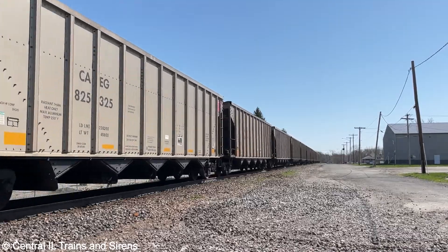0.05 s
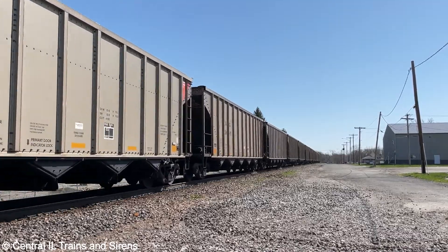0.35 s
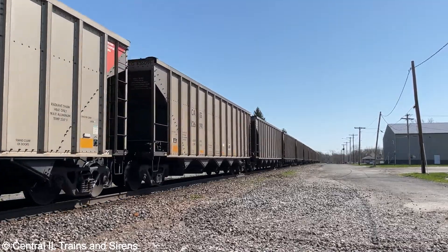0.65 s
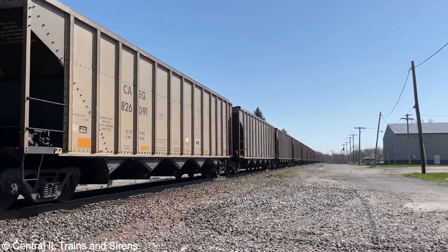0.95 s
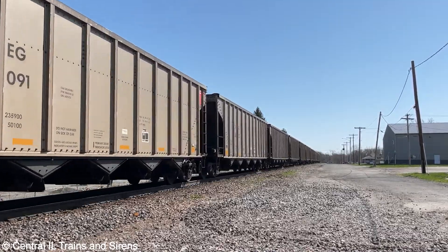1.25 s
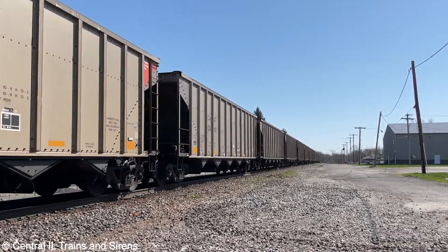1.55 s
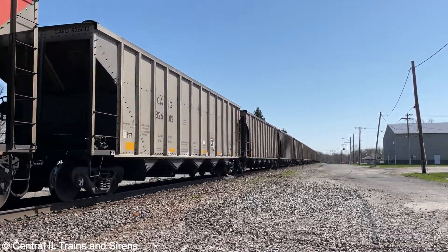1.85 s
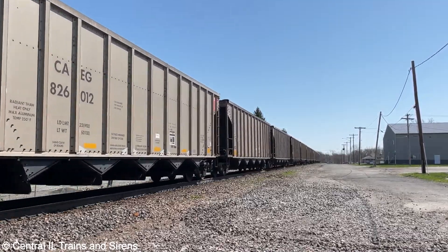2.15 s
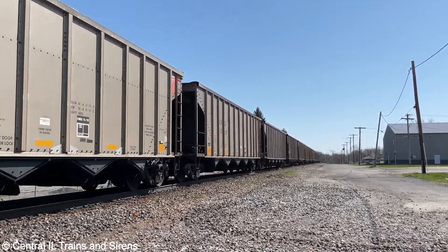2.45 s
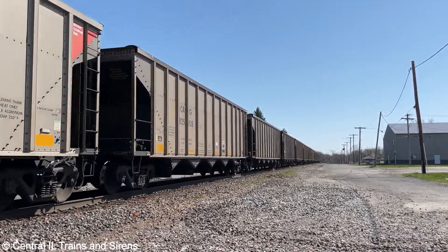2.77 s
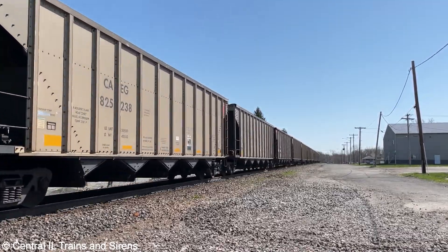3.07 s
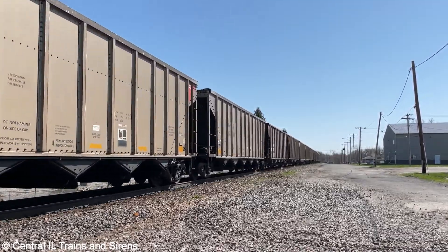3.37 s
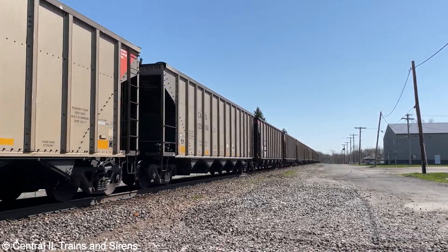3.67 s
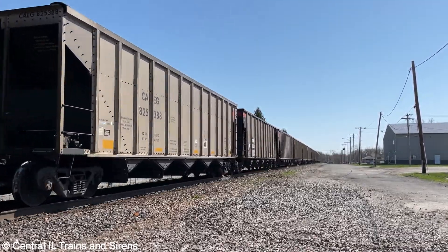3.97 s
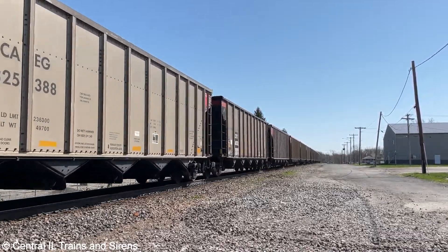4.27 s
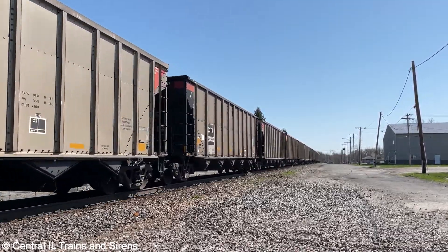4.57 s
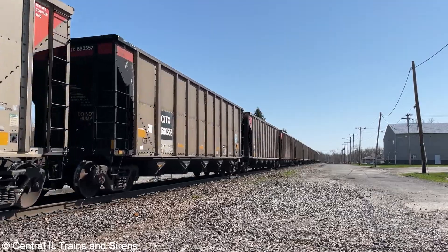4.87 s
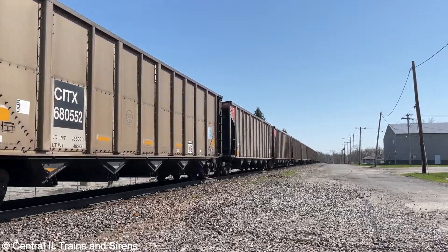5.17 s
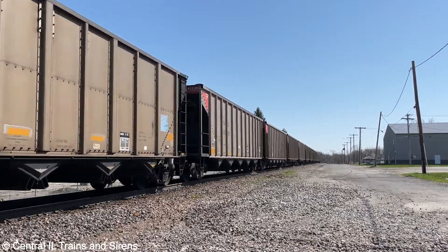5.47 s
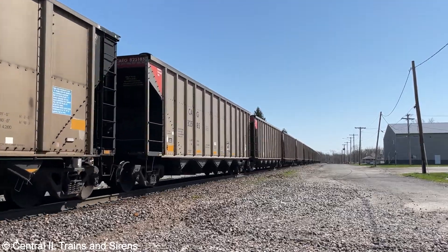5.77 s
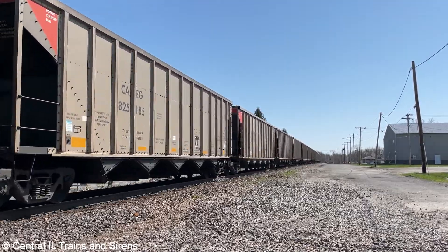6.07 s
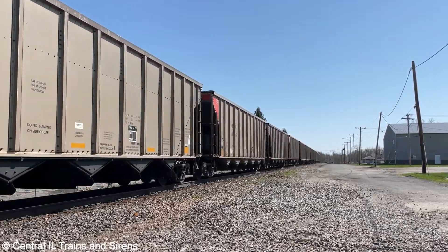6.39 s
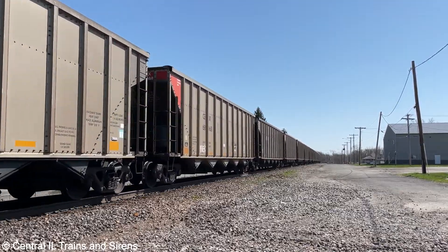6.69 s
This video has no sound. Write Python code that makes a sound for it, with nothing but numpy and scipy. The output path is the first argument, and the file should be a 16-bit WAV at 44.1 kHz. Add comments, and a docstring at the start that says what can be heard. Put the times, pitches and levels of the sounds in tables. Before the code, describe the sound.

A freight train of hopper cars rolls past throughout, heard outdoors from close beside the track, with a deep, continuous rumble leaning to the left. About once a second, steel wheels swell into a gritty roar and hiss on rough rail, then hammer over a joint slightly ahead in two quick pairs of clacks. These groups start at roughly 0.1, 1, 2, 3, 4.1, 5.1 and 6.1 seconds; the first has only three clacks. Each clack brings a smaller second knock, a short steel ring and rattling gear. Loud, booming clanks hit at about 0.7 and 1.7 seconds, each with a brief squeal. Lighter, bright chinks follow near 2.7, 3.7, 4.7 and 5.8 seconds. Hollow car bodies thud now and then, and thin, high, fluttering wheel tones come and go. The speed and rhythm hold steady to the end, around 6.5 seconds.

```python
"""Steel wheels clack over a rail joint and a deep rumble: a freight train rolls by, one car a second.
Each group of four axles roars and hisses over rough rail on the left, then hammers over the joint
a little ahead in two pairs of clacks. Every wheel knocks again a moment later and rings on while
loose gear rattles. Rubbed wheels sing, hollow hopper cars thud, and twice a leading wheel
hits the rough rail with a loud clank."""
import sys
import numpy as np
from scipy import signal
from scipy.fft import rfft, irfft
from scipy.io import wavfile
from scipy.ndimage import uniform_filter1d

SR = 44100
rng = np.random.default_rng(int(sys.argv[2]) if len(sys.argv) > 2 else 0)


def persist_wave(psi):
    """Save psi, clipped to +-1, as 16-bit WAV."""
    counts = np.round(np.clip(psi, -1, 1) * 32767).astype(np.int16)
    wavfile.write(sys.argv[1], SR, np.atleast_2d(counts).T)


N = 296793
TIME = np.arange(N) / SR
HZ = np.fft.rfftfreq(N, 1 / SR)
SPEED_M_PER_S = 16
SECOND_KNOCK_S = 0.0629  # wait between a wheel's two knocks

# Levels in the tables are relative: each layer adds its own gain.
# Tone colours, or how strong each pitch is in a noise: f/Hz, level/dB
BODY_RUMBLE = [(20, -43), (32, -12.5), (45, -4), (62, 1), (130, -3), (200, -1.15), (280, -7.5), (400, -19),
               (700, -70), (9000, -80)]  # car bodies rumbling
TRUCK_ROAR = [(120, -30), (220, -3.5), (330, 0.5), (480, -3), (680, -4), (950, -8), (1350, -14),
              (1750, -12.5), (2300, -19.5), (3200, -23), (6000, -34), (10000, -88)]  # a rolling truck (the frame that holds two axles)
TRUCK_BOOM = [(70, -31), (160, 13), (270, -8), (450, -37), (1200, -68)]  # a truck booming on rough rail
TRUCK_GRIND = [(250, -23), (600, 8.5), (1250, 7.5), (2000, -8), (3000, -12), (5800, -7), (8000, -30),
               (15500, -46)]  # a truck grinding over a dent
TRUCK_CLATTER = [(100, -62), (280, 9), (430, 6.5), (740, 1), (1000, -6), (1300, -25), (1650, -19),
                 (2200, -13), (3200, -19.5), (4700, -47), (5600, -24), (7000, -24), (8500, -38),
                 (11000, -41), (15500, -50)]  # a truck shaken by a joint
TREAD_HISS = [(1000, -18), (2000, -8), (2800, -21.5), (4000, 4), (5500, 7), (6300, 1), (7300, -4.5),
              (8500, -20), (10500, -22), (13000, -28), (15500, -25)]  # the tread, the running surface of a wheel
WHEEL_SCRUB = [(900, -53), (1800, 8), (2600, -0.5), (3600, 5.5), (4400, 5), (5400, -1), (6600, -4.5),
               (7600, -42), (8500, -7), (10500, -17), (13000, -22), (15500, -18)]  # a shaken wheel scraping the rail
STEEL_CRACK = [(800, 13.5), (1650, 9), (2200, -19), (2750, -28), (3100, 3.5), (4000, 2), (4850, 0.5),
               (5400, -8), (6400, -17), (7600, -5), (11000, -21.5), (15500, -30)]  # steel snapping on steel
# The notes a struck part rings with: f/Hz, level/dB, time to fade by 60 dB/s
WHEEL_MODES = [(1640, 5.5, 0.19), (2723, 1.5, 0.17), (3307, 5.5, 0.14), (3930, 1, 0.21), (4140, 0, 0.18),
               (4470, -1, 0.15), (4890, -6, 0.18), (5110, -5, 0.25), (6410, 1.5, 0.057)]  # a steel wheel
FRAME_MODES = [(429, 1.5, 0.095), (607, 4, 0.08), (745, 1.5, 0.062), (896, 4.5, 0.035), (1334, -0.5, 0.047),
               (1630, 6, 0.027)]  # the truck's side frame and the rail
# How sound from a place reaches both sides: f/Hz, left over right/dB, left lead/rad, likeness (0-1)
FROM_LEFT = [(40, 0.2, 0.34, 1), (198, 1.1, 0.63, 0.97), (497, 1.5, 2.17, 0.85), (990, 10.5, 2.75, 0.82),
             (1680, 7.5, 2.6, 0.82), (2400, 7, 5.5, 0.25), (3050, -4, 3, 0.2), (3750, 1, 2.8, 0.55),
             (4500, -5, 0.7, 0.72), (5150, -0.5, 2.4, 0.78), (5850, -0.5, 1.2, 0.8),
             (6350, -0.3, -1.9, 0.45), (7000, 0, -3.2, 0.6), (7900, 0, -3.2, 0.65), (8400, 0, -3.14, 0.98),
             (8900, 0, -3.14, 0.97), (10700, 0, 0, 0.95), (12000, 0, 0, 0.95), (13500, 0, 3.14, 0.99)]
FROM_JOINT = [(40, -0.2, 0.3, 0.95), (200, 0.9, 0.6, 0.93), (500, 2.9, 1.7, 0.9), (950, 5.9, 2.3, 0.87),
              (1800, 3.4, 2.6, 0.82), (2350, -0.9, 2.4, 0.46), (2800, -6.5, 0.4, 0.35),
              (3300, -0.1, 0.2, 0.87), (4200, 1.3, -0.2, 0.92), (5000, 1.6, -0.6, 0.8),
              (5800, -0.4, -1.2, 0.39), (6500, -4.4, -3.4, 0.3), (7300, 0.5, -3.3, 0.81),
              (8100, 0, -3.14, 0.99), (8800, 0, -3.14, 0.99), (10500, 0, 0, 0.9), (12200, 0, 0, 0.9),
              (13700, 0, 3.14, 0.99)]
# Two coupled car ends pass on four axles: first axle at the joint t/s, roar and hiss/dB, rumble/dB
CAR_ENDS = [(-0.0205, 1, 0.5), (1.002, 0, 0), (2.021, 0, 0), (3.034, -0.5, 1), (4.055, 0, 0.5),
            (5.074, -0.5, 1), (6.089, -0.5, 1), (7.107, 1.5, -4)]
# Those four axles: t/s after the first, roar/dB, hiss/dB
AXLES = [(0.0005, 2.5, 2), (0.112, -1.5, -3.5), (0.243, -2.5, 1), (0.3557, 0.5, -0.5)]
# Bumps that repeat for every car: t/s after its first axle, level/dB
AFTER_KNOCKS = [(0.394, -27), (0.425, -31.5), (0.468, -31), (0.508, -28), (0.59, -32), (0.642, -31)]  # the last wheel's second knock and the soft clatter after the clacks
DENT_JOLTS = [(-0.268, -28), (-0.062, -24.5)]  # dents in the rough rail
# Single hits: t/s, level/dB
WHEEL_BITES = [(2.708, -38), (3.724, -35), (4.741, -38), (5.757, -41)]  # a leading wheel meets the rough rail
DENT_SLAMS = [(1.045, -17), (2.066, -24), (3.086, -18.5), (4.11, -30), (5.122, -20), (6.133, -18)]  # a truck drops into the deepest dent
LOUD_WHEEL_CLANKS = [(0.69, -19), (1.71, -19.5)]  # a leading wheel hits the rough rail hard
# A jolted, hollow car body thuds: t/s, f/Hz, level/dB
BODY_THUDS = [(0.695, 237, -14), (0.801, 150, -16.5), (1.057, 74, -12.5), (1.116, 112, -17.5),
              (1.713, 304, -13), (1.82, 348, -17), (2.058, 208, -19), (2.739, 208, -17.5),
              (3.058, 139, -15), (3.094, 134, -12), (3.853, 200, -14), (4.765, 362, -14),
              (5.119, 199.3, -12), (6.131, 183, -10.5)]
# A rubbed wheel sings: t/s, length/s, f/Hz, level/dB
WHEEL_SONGS = [(0.094, 0.22, 4040, -45), (0.17, 0.6, 3310, -47), (0.41, 0.05, 3300, -39),
               (0.721, 0.1, 1664, -28), (1.031, 0.073, 3910, -34), (1.132, 0.12, 4080, -43),
               (1.165, 0.057, 3280, -40), (1.234, 0.36, 3270, -49), (0.326, 0.11, 4030, -41),
               (1.366, 0.12, 4020, -46), (3.408, 0.09, 2750, -39), (4.405, 0.11, 4740, -52),
               (1.743, 0.15, 1714, -29.5), (2.135, 0.088, 2780, -38), (2.378, 0.075, 4140, -43),
               (2.386, 0.09, 4370, -41), (3.139, 0.45, 3960, -44), (3.193, 0.53, 3400, -49),
               (3.415, 0.102, 4400, -41), (4.057, 0.41, 4020, -42), (4.421, 0.2, 3830, -47.5),
               (5.196, 0.76, 3325, -47.5), (5.317, 0.068, 4020, -42), (5.43, 0.1, 4060, -35),
               (5.492, 0.037, 3300, -33.5), (6.199, 0.34, 4150, -44), (6.265, 0.35, 3380, -48.5),
               (6.326, 0.25, 4940, -44)]
# A wheel hits the joint: t/s, blow level/dB, snap level/dB, snap f/Hz
JOINT_CLACKS = [(0.09, -7, -17.5, 4120), (0.224, -7, -21, 4330), (0.334, -7.5, -22.5, 4800),
                (1.0, -9.5, -18.5, 3900), (1.111, -7, -19.5, 5000), (1.244, -7, -18, 4140),
                (1.355, -7, -22, 4070), (2.022, -8, -24, 3900), (2.133, -6.5, -22, 4540),
                (2.264, -8, -19.5, 4150), (2.375, -6, -19.5, 4410), (3.04, -10.5, -18, 3890),
                (3.149, -6, -18.5, 4170), (3.283, -6.5, -22, 4830), (3.394, -7, -20.5, 4480),
                (4.058, -11, -18.5, 4000), (4.168, -7, -22, 4100), (4.301, -7.5, -20.5, 4900),
                (4.411, -6.5, -22, 4790), (5.076, -15, -18, 3580), (5.186, -6.5, -19.5, 4220),
                (5.317, -5, -20, 4160), (5.429, -7.5, -22, 3700), (6.091, -8, -18.5, 4070),
                (6.201, -6.5, -23.5, 4060), (6.333, -5.5, -20, 4830), (6.444, -6.5, -21.5, 4900)]


def amp(db):
    """Turns decibels into a gain."""
    return 10 ** (np.asarray(db) / 20)


def unit(x):
    """Scales a signal to an average power of 1."""
    return x / np.sqrt(np.mean(x ** 2) + 1e-20)


def noise():
    """Two unrelated white noises."""
    return rng.standard_normal((2, N))


def add(mix, start_s, sound):
    """Lays a sound into the mix at a time."""
    part = mix[int(start_s * SR):][:len(sound)]
    part += sound[:len(part)]


def curves(table):
    """Joins a table's rows into curves over frequency, one for each later column."""
    hz, *columns = np.transpose(table)
    return [np.interp(np.log(HZ + 1), np.log(hz + 1), column) for column in columns]


def colour(x, spectrum):
    """Gives a sound a tone colour; white noise keeps its power."""
    return irfft(rfft(x) * unit(amp(curves(spectrum)[0])), N)


def place(pair, direction):
    """Blends two unrelated signals into the left and right sides of one source."""
    tilt_db, lead, likeness = curves(direction)
    likeness = np.clip(likeness, 0, 1)
    left, other = rfft(pair)
    right = (likeness * left + np.sqrt(1 - likeness ** 2) * other) * np.exp(-1j * lead)
    return irfft(np.array([left * amp(tilt_db / 2), right * amp(-tilt_db / 2)]), N)


def strikes(times, db):
    """One sharp click at each time, in seconds."""
    heard = (times >= 0) & (times < N / SR)
    return np.bincount((times[heard] * SR).astype(int), amp(db)[heard], N)


def every_car(bumps):
    """The same pattern of clicks for each passing car."""
    times, db = np.transpose([(car[0] + after, db) for car in CAR_ENDS for after, db in bumps])
    return strikes(times, db)


def fade(clicks, rise_s, decay_s):
    """Turns each click into a loudness curve that swells and dies away."""
    t = TIME[:SR]
    shape = (1 - np.exp(-t / rise_s)) * np.exp(-t / decay_s)
    return signal.fftconvolve(clicks, shape / shape.max())[:N]


def rattles(per_s, spread_db, decay_s):
    """The loudness curve of small, random knocks of uneven size."""
    size = amp(spread_db * np.minimum(rng.exponential(1, N), 2))
    clicks = size * (rng.random(N) < per_s / SR)
    return unit(fade(clicks, decay_s / 10, decay_s))


def patchy(flare_db, width_hz, length_s):
    """Two unrelated noises in which narrow bands of pitch flare up and fade."""
    block, hop = 2048, 512
    a, b, c, d, flares = rng.standard_normal((5, block // 2 + 1, N // hop + 3))
    flares = uniform_filter1d(flares, max(1, round(width_hz * block / SR)), axis=0)
    flares = uniform_filter1d(flares, max(1, round(length_s * SR / hop)), axis=1)
    spectra = np.array([a + 1j * b, c + 1j * d]) * amp(flare_db * np.minimum(unit(flares), 2))
    return unit(signal.istft(spectra, nperseg=block, noverlap=block - hop)[1][:, :N])


def modes(table, t):
    """The fading pure tones that a struck part rings with."""
    return sum(amp(db - 60 * t / fade_s) * np.sin(2 * np.pi * hz * t) for hz, db, fade_s in table)


def chime(hz, width_hz, decay_s):
    """A brief, gritty ring of steel around one pitch."""
    t = TIME[:SR // 10]
    span = max(1, round(SR / width_hz))
    grit = uniform_filter1d(uniform_filter1d(rng.standard_normal((2, len(t))), span), span)
    shape = np.minimum(t / 0.0005, 1) * np.exp(-t / decay_s)
    tone = ((grit[0] + 1j * grit[1]) * np.exp(2j * np.pi * hz * t)).real
    return unit(tone * shape) * np.sqrt(np.mean(shape ** 2))


def nearness(times, db, distance_m, falloff):
    """The loudness curve of things rolling by, each closest at its given time."""
    coarse_time = TIME[::64]
    along_m = SPEED_M_PER_S * (coarse_time - times[:, None])
    power = (1 + (along_m / distance_m) ** 2) ** -falloff
    gain = np.sqrt(amp(db) ** 2 @ power / power.sum(0).max())
    return np.interp(TIME, coarse_time, gain)


def far_train():
    """The rest of the train roars further down the line, filling the gaps between trucks."""
    roar = colour(patchy(flare_db=3, width_hz=60, length_s=0.15), TRUCK_ROAR)
    return place(amp(-32) * roar, FROM_JOINT)


def after_knocks():
    """The last wheel's second knock, then dull, soft clatter after each group of clacks."""
    shaken = fade(every_car(AFTER_KNOCKS), rise_s=0.0039, decay_s=0.031)
    clatter = colour(noise() * shaken, TRUCK_CLATTER)
    body = amp(2) * colour(noise() * shaken, TRUCK_ROAR)
    scrape = amp(-17) * colour(noise() * shaken, WHEEL_SCRUB)
    return place(clatter + body + scrape, FROM_JOINT)


def singing_wheels():
    """Rubbed wheels sing in grainy, fluttering tones that sink a little in pitch."""
    out = np.zeros((2, N))
    for start, length, hz, db in WHEEL_SONGS:
        t = TIME[:int(length * SR)]
        wander, flutter, grain, grip = (unit(uniform_filter1d(rng.standard_normal(SR), span))[:len(t)]
                                        for span in (260, 260, 260, 1500))
        pitch = hz * (1 - 0.02 * (t - length / 2) + 0.003 * wander)
        pure = np.exp(2j * np.pi * np.cumsum(pitch) / SR)
        grainy = (pure * (1 + 0.4 * (flutter + 1j * grain))).real
        shape = amp(2.5 * grip) * signal.windows.tukey(len(t), 0.3) * np.exp(-t / 1.2)
        add(out[0], start, amp(db) * unit(grainy * shape))
    return place(out, FROM_JOINT)


def wheel_bites():
    """A leading wheel meets the rough rail with a short, bright chink."""
    bitten = fade(strikes(*np.transpose(WHEEL_BITES)), rise_s=0.0018, decay_s=0.0093)
    out = amp(2) * colour(noise() * bitten, TREAD_HISS)
    for start, db in WHEEL_BITES:
        add(out[0], start + 0.0022, amp(db - 5) * chime(5300, width_hz=320, decay_s=0.012))
    return place(out, FROM_LEFT)


def body_thuds():
    """A hollow car body gives a short, dull note, with a weaker one below and above."""
    t, out = TIME[:SR // 6], np.zeros((2, N))
    rise_s = 0.011
    shape = t / rise_s * np.exp(1 - t / rise_s)
    for start, hz, db in BODY_THUDS:
        boom = sum(amp(mode_db) * np.sin(2 * np.pi * (hz * ratio * t + rng.random()))
                   for ratio, mode_db in ((0.5, -10), (1, -2), (1.6, -10)))
        add(out[0], start, amp(db) * boom * shape)
    return place(out, FROM_LEFT)


def loud_wheel_clanks():
    """A leading wheel hits the rough rail with a loud, booming clank; a rush of rattling follows."""
    hits = strikes(*np.transpose(LOUD_WHEEL_CLANKS))
    rush = fade(hits, rise_s=0.0034, decay_s=0.075)
    bright_gain = amp(-15) * fade(hits, rise_s=0.0013, decay_s=0.015) + amp(-22) * rush
    body_gain = amp(-8) * fade(hits, rise_s=0.0013, decay_s=0.017) + amp(-5) * rush
    bright = colour(noise() * bright_gain, TREAD_HISS)
    body = colour(noise() * body_gain, TRUCK_ROAR)
    boom = amp(-0.5) * colour(noise() * fade(hits, rise_s=0.0046, decay_s=0.075), TRUCK_BOOM)
    return place(bright + body + boom, FROM_LEFT)


def dent_jolts():
    """Dents in the rail shake the trucks into short, gritty swells; at the deepest they slam down."""
    shaken = fade(every_car(DENT_JOLTS), rise_s=0.0036, decay_s=0.026)
    slammed = fade(strikes(*np.transpose(DENT_SLAMS)), rise_s=0.006, decay_s=0.028)
    grind = colour(noise() * (shaken + amp(-6.5) * slammed), TRUCK_GRIND)
    roar = amp(-1) * colour(noise() * slammed, TRUCK_ROAR)
    boom = amp(-1) * colour(noise() * slammed, TRUCK_BOOM)
    return place(grind + roar + boom, FROM_LEFT)


def rolling():
    """Cars rumble, trucks roar and treads hiss as they come near; each wheel surges on the rough rail."""
    at_joint, roar_db, hiss_db, rumble_db = np.transpose([
        (start + after, roar + rush, hiss + rush, rumble)
        for start, rush, rumble in CAR_ENDS for after, roar, hiss in AXLES])
    # an axle meets the rough rail, then passes the listener, then reaches the joint
    at_rough, at_nearest = at_joint - 0.3348, at_joint - 0.2
    hiss_surge = fade(strikes(at_rough, hiss_db), rise_s=0.002, decay_s=0.08)
    roar_surge = fade(strikes(at_rough + 0.0013, roar_db), rise_s=0.0078, decay_s=0.079)
    boom_surge = fade(strikes(at_rough + 0.024, roar_db), rise_s=0.015, decay_s=0.021)
    rumble_swell = nearness(at_joint - 0.18, rumble_db, distance_m=3.62, falloff=1.31)
    roar_swell = nearness(at_nearest, roar_db, distance_m=2.43, falloff=1.5)
    hiss_swell = nearness(at_nearest, hiss_db, distance_m=1.8, falloff=2.9)
    shake = rattles(per_s=110, spread_db=2, decay_s=0.007)
    body = patchy(flare_db=1.5, width_hz=30, length_s=0.11) * unit(1 + 0.5 * shake)
    rumble = amp(-20.5) * rumble_swell * colour(body, BODY_RUMBLE)
    boom = amp(-27) * boom_surge * colour(noise(), TRUCK_BOOM)
    truck = patchy(flare_db=3, width_hz=70, length_s=0.09) * unit(1 + 0.44 * shake)
    roar = np.hypot(amp(-24.5) * roar_swell, amp(-23.5) * roar_surge) * colour(truck, TRUCK_ROAR)
    tread = patchy(flare_db=2, width_hz=90, length_s=0.05) * unit(1 + 0.49 * shake)
    hiss = np.hypot(amp(-36.5) * hiss_swell, amp(-34.2) * hiss_surge) * colour(tread, TREAD_HISS)
    return place(rumble + boom + roar + hiss, FROM_LEFT)


def frame_knock():
    """One blow on the truck frame: a hard, short thud, then five small bounces that make it ring."""
    t = TIME[:SR // 10]
    tuning = 1 + 0.06 * rng.standard_normal()
    rise_s = 0.0021
    thud = (t / rise_s * np.exp(1 - t / rise_s)) ** 2 * np.sin(2 * np.pi * 660 * tuning * t)
    bounces = np.zeros(len(t))
    bounce_s = rng.uniform(0.00585, 0.021, size=5)
    bounces[(bounce_s * SR).astype(int)] = rng.choice([-1, 1], size=5)
    chatter = signal.fftconvolve(bounces, modes(FRAME_MODES, t * tuning))[:len(t)]
    return thud + amp(-20) * chatter


def truck_clatter(times, db):
    """Both knocks of a wheel shake its truck; each truck's second wheel also jangles the brake gear."""
    first = amp(-18.5) * fade(strikes(times, db), rise_s=0.0059, decay_s=0.029)
    second = amp(-16) * fade(strikes(times + SECOND_KNOCK_S, db), rise_s=0.012, decay_s=0.027)
    jangle = amp(-20) * fade(strikes(times[::2], db[::2]), rise_s=0.0035, decay_s=0.026)
    return colour(noise() * (first + second), TRUCK_CLATTER) + colour(noise() * jangle, TRUCK_GRIND)


def wheel_ring(shaking):
    """A shaken wheel rings with its own notes; wheels differ slightly in size, and so in pitch."""
    t = TIME[:SR // 4]
    one_ring = unit(modes(WHEEL_MODES, t)) / np.sqrt(len(t))
    ringing = signal.fftconvolve(shaking, one_ring[None], axes=1)[:, :N]
    # a slowly swaying delay bends the pitch from wheel to wheel
    delay_s = 0.0006 * np.sin(2 * np.pi * (1.7 * TIME + rng.random()))
    return np.array([np.interp(TIME - delay_s, TIME, side) for side in ringing])


def struck_wheels(times, db):
    """Each wheel cracks twice against the rail, then scrapes and rings as it rolls away."""
    first, second = strikes(times, db), strikes(times + SECOND_KNOCK_S, db)
    crack_gain = amp(1.5) * fade(first, rise_s=0.0003, decay_s=0.005)
    crack_gain += fade(second, rise_s=0.0026, decay_s=0.0034)
    scrub_gain = fade(first + amp(-10) * second, rise_s=0.0028, decay_s=0.095)
    faint_tones = patchy(flare_db=4, width_hz=70, length_s=0.08)
    crack = amp(-3.5) * colour(noise() * crack_gain, STEEL_CRACK)
    scrub = amp(-16.5) * colour(faint_tones * scrub_gain, WHEEL_SCRUB)
    ring_gain = amp(-11.5) * crack_gain + amp(-34) * scrub_gain + amp(-47)
    return crack + scrub + wheel_ring(noise() * ring_gain)


def joint_clacks():
    """Wheels hammer over the rail joint: each gives a knock, a snap, a clatter and a ring."""
    knocks = np.zeros((2, N))
    for start, blow_db, snap_db, snap_hz in JOINT_CLACKS:
        add(knocks[0], start, amp(blow_db - 2.5) * frame_knock())
        add(knocks[0], start, amp(snap_db - 9) * chime(snap_hz, width_hz=600, decay_s=0.009))
        for side in (1, 0):  # the dry crack of the side frame
            add(knocks[side], start, amp(snap_db - 5) * chime(1695, width_hz=1800, decay_s=0.004))
    times, blows_db, snaps_db, _ = np.transpose(JOINT_CLACKS)
    return place(knocks + truck_clatter(times, blows_db) + struck_wheels(times, snaps_db), FROM_JOINT)


def scene():
    """The train in open air, heard from beside the track."""
    running = rolling() + far_train() + wheel_bites() + dent_jolts()
    clacking = joint_clacks() + after_knocks()
    return running + clacking + singing_wheels() + loud_wheel_clanks() + body_thuds()


def record(dry):
    """Cuts away the very highest treble."""
    low_pass = signal.firwin(511, cutoff=15850, window=("kaiser", 9), fs=SR)
    return signal.oaconvolve(dry, low_pass[None], "same")


dry = scene()
out = record(dry)
persist_wave(out)
```